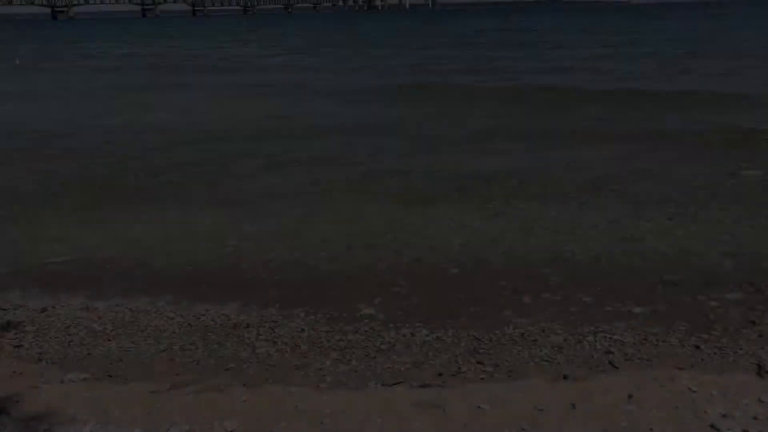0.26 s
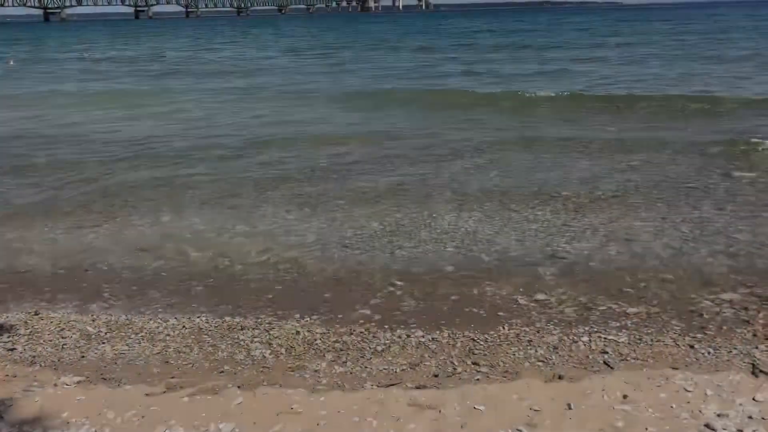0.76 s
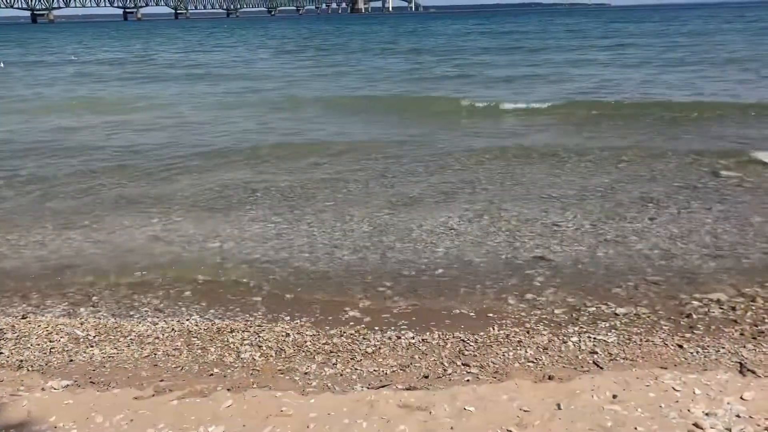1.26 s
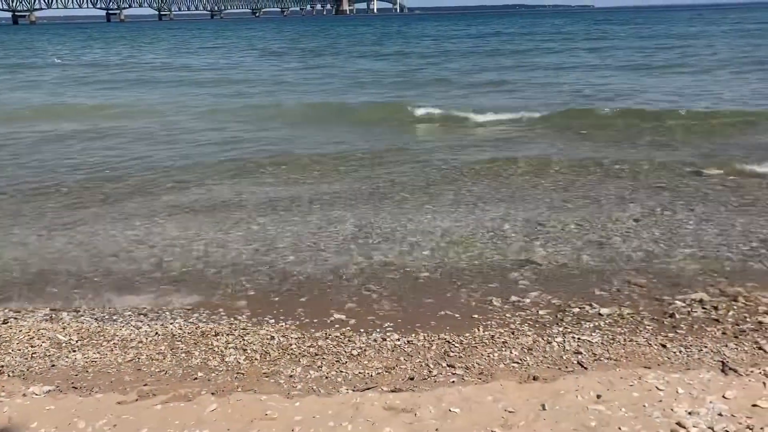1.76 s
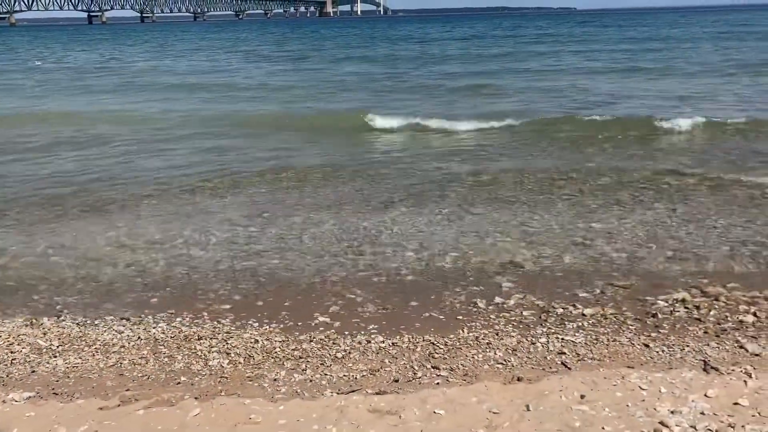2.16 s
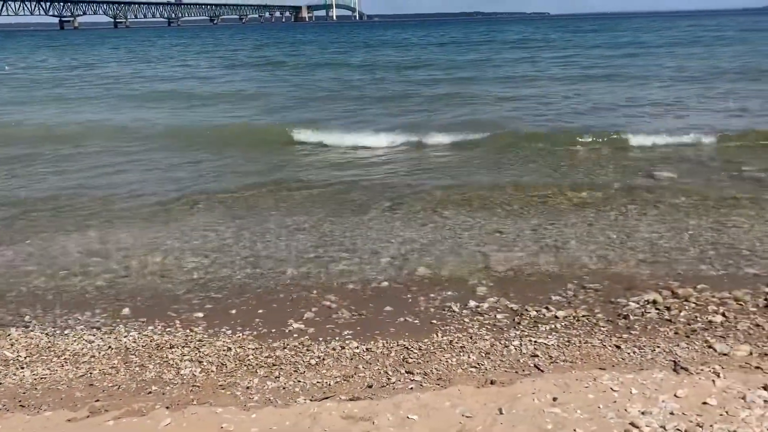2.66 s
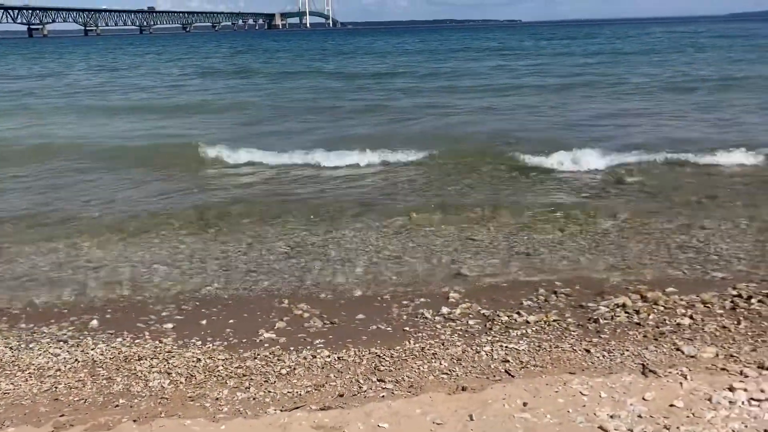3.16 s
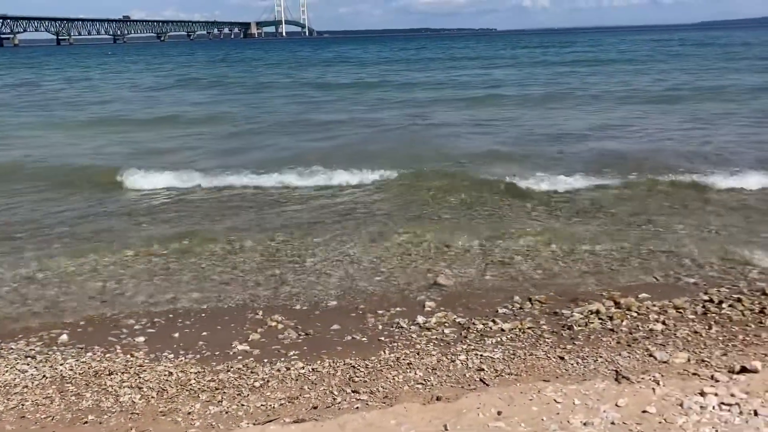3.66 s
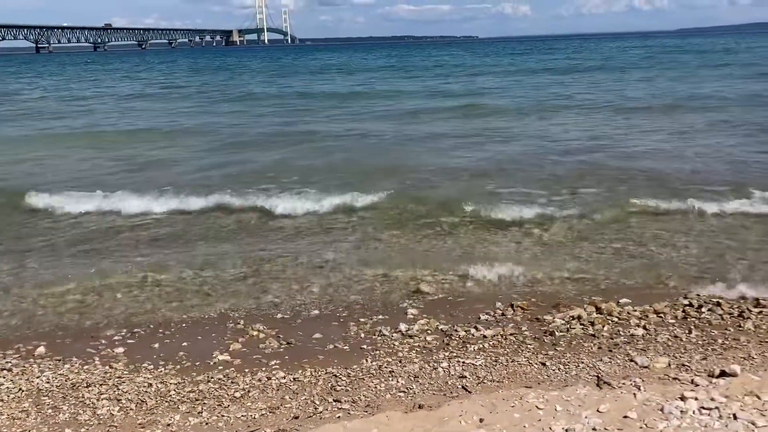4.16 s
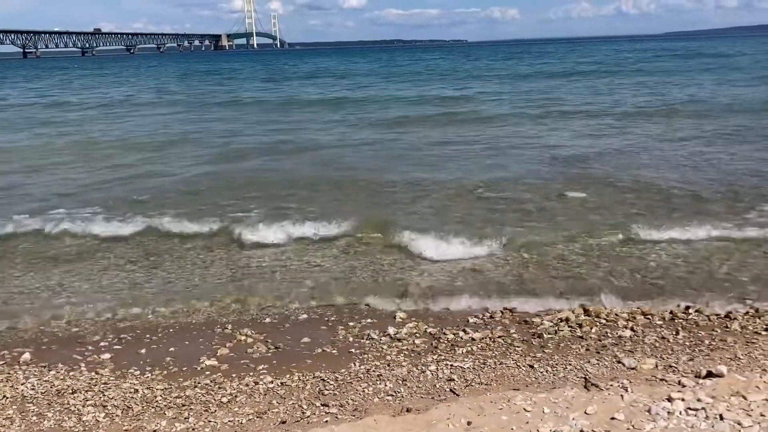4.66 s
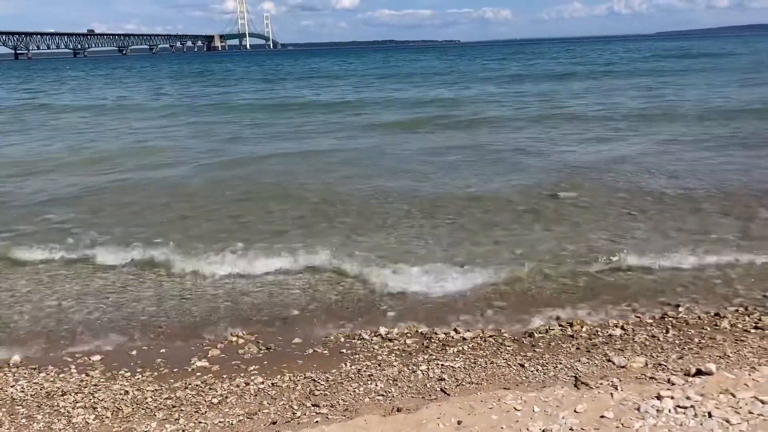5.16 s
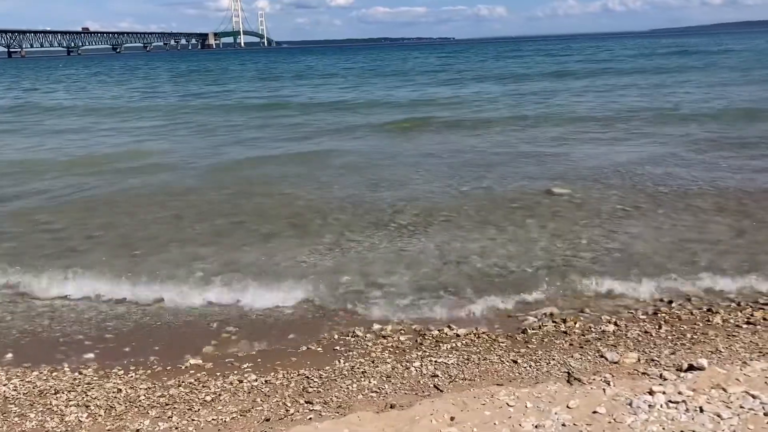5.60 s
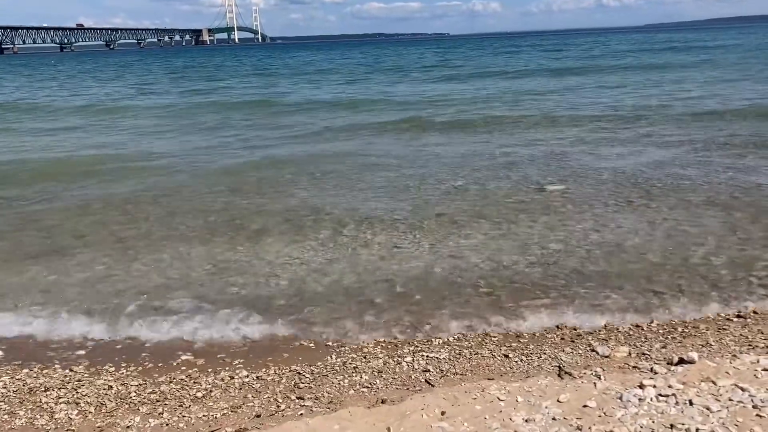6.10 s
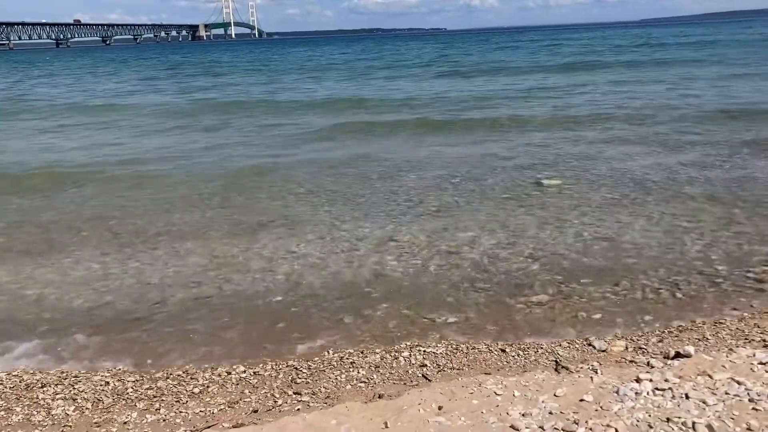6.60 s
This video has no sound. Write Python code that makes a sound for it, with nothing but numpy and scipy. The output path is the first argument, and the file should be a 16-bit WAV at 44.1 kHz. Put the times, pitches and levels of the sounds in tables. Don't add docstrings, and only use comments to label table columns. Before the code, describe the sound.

The sound rises from silence during the first second: low, uneven wind buffeting on a hand-held stereo microphone, muffled booms of distant surf, and foamy wash toward the right. Fine, bright spray fizzes on pebbles throughout, over a mid-toned watery rush. From 1.5 s a few rounded bubbles plop, including one clearly left at 2.3 s, and faint dry pebble ticks appear now and then. Around 3 s wind gusts again and a close, deeper breaker starts crossing from right to left. Between 4.4 and 4.7 s come its strongest, thickest plops, as the foam swells; more gurgling bubbles follow from 5 to 6 s. The wash and pebble hiss surge near 6 s, then ease. The fizz sinks into the stones, leaving softer foam at the left, scattered plops and low wind until about 6.8 s.

```python
import sys
import numpy as np
from scipy import signal
from scipy.fft import rfft, irfft, next_fast_len
from scipy.io import wavfile
from scipy.ndimage import uniform_filter1d, map_coordinates

SR = 44100
rng = np.random.default_rng(int(sys.argv[2]) if len(sys.argv) > 2 else 0)


def materialize(psi):
    bounded = np.clip(np.atleast_2d(psi).T, -1, 1)
    quanta = np.round(bounded * 32767).astype(np.int16)
    wavfile.write(sys.argv[1], SR, quanta)


def how_loud(loudness_db):
    steps = np.asarray(loudness_db, float) / 20
    return 10 ** steps


N = 301644
TIME_S = np.arange(N) / SR
FRAME = 512
HZ = np.fft.rfftfreq(FRAME, 1 / SR)[:, None]


def unit(x):
    return x / np.sqrt(np.mean(np.abs(x) ** 2) + 1e-20)


def along(points, hz):
    f, v = np.transpose(points)
    return np.interp(np.log(hz + 1), np.log(f + 1), v)


def curves(rows, count):
    s, *columns = np.transpose(rows)
    steps_s = np.linspace(0, N / SR, count)
    return [np.interp(steps_s, s, column) for column in columns]


def frames(x):
    return signal.stft(x, nperseg=FRAME, noverlap=FRAME * 3 // 4)[2]


def sound(z):
    return signal.istft(z, nperseg=FRAME, noverlap=FRAME * 3 // 4)[1][..., :N]


def colour(spectrum):
    return unit(how_loud(along([(1, -120), *spectrum, (SR / 2, -120)], HZ)))


def patches(shape, wide, long, depth_db):
    field = rng.standard_normal(shape)
    for _ in range(2):
        field = uniform_filter1d(field, round(wide), 0)
        field = uniform_filter1d(field, round(long), 1)
    return unit(how_loud(depth_db * unit(field)))


def wander(rate_hz):
    return map_coordinates(rng.standard_normal(200), [TIME_S * rate_hz])


def swells(events, width_s):
    return sum(db * np.exp(-((TIME_S - s) / width_s) ** 2) for s, db in events)


def bubbles(start_s, hz, size, cycles, rise):
    typical_hz = np.median(hz)
    samples = round(6 * cycles * SR / typical_hz)
    u = np.linspace(0, 6, samples)[None] * hz[:, None] / typical_hz
    swell_and_decay = u * np.exp(1 - u)
    wave = size[:, None] * swell_and_decay * np.sin(2 * np.pi * cycles * u * (1 + rise * u))
    at = (start_s * SR).astype(int)[:, None] + np.arange(samples)
    return np.bincount(at.ravel(), wave.ravel(), N + SR)[:N]


def panned_bubbles(events, trim_db, cycles, rise):
    s, db, hz, pan_db = np.transpose(events)
    left = bubbles(s, hz, how_loud(db + trim_db + pan_db / 2), cycles, rise)
    right = bubbles(s, hz, how_loud(db + trim_db - pan_db / 2), cycles, rise)
    return np.array([left, right])


def froth(count, centre_hz, spread, cycles, bubble_db):
    start_s = rng.random(count) * N / SR
    size = np.minimum(rng.exponential(size=count), 4)
    hz = centre_hz * np.exp(spread * np.clip(rng.standard_normal(count), -1, 2))
    pops = bubbles(start_s, hz, how_loud(1.7 * size), cycles, rise=0.028)
    return frames(unit(rng.standard_normal(N) + how_loud(bubble_db) * unit(pops)))


def lagged(z, turns):
    turn = np.exp(-1j * np.pi * turns)
    return np.array([z * turn, z / turn])


# t/s, foam level/dB, level/dB of drag over pebbles
SEA_MOTION = [(0.9, -37.5, -46.5), (1.42, -37.5, -45.5), (1.5, -39, -46.5), (1.83, -37.5, -44.5),
              (1.9, -41, -46.5), (3.27, -37, -46.5), (3.29, -38.5, -48.5), (3.55, -41, -49.5),
              (4.14, -38, -49), (4.29, -37.5, -49.5), (4.34, -39.5, -45), (4.58, -35, -45),
              (5.22, -37.5, -44.5), (5.32, -38, -49.5), (5.35, -36.5, -47), (6.06, -34.5, -43),
              (6.14, -37.5, -45.5), (6.78, -39.5, -47.5)]


def follows(law, count):
    mean_db, per_foam, per_drag = law
    foam_db, drag_db = curves(SEA_MOTION, count)
    return mean_db + per_foam * (foam_db - foam_db.mean()) + per_drag * (drag_db - drag_db.mean())


# f/Hz, level/dB
PORT_DIFFERENCE = [(30, -10), (70, -12), (150, -15), (300, -10.5)]


def low_noise(spectrum):
    size = next_fast_len(N)
    hz = np.fft.rfftfreq(size, 1 / SR)
    tone = how_loud(along([*spectrum, (2000, -120)], hz))
    gain = np.array([tone, tone * how_loud(along(PORT_DIFFERENCE, hz))])
    mid, side = irfft(rfft(rng.standard_normal((2, size))) * gain, size)[:, :N]
    return unit(np.array([mid + side, mid - side]))


# f/Hz, level/dB per Hz
WIND_SPECTRUM = [(20, -32), (32, -26), (50, -8.5), (67, -0.5), (90, -2.5), (115, -13), (160, -32)]
# t/s, level/dB above calm
WIND_GUSTS = [(.39, 5.5), (.63, 5.5), (1.2, 6.5), (1.5, 1.5), (1.85, 1), (2.19, 0), (2.55, 3.5), (2.79, 0),
              (3.12, 7), (3.51, 6), (4.05, 5), (4.35, 5.5), (4.62, 3.5), (5.03, 6.5), (5.4, 3.5), (5.67, 4),
              (6.27, 2.5), (6.6, 4)]
# f/Hz, level/dB per Hz
FAR_SURF_SPECTRUM = [(80, -23), (115, -1), (140, 1), (200, -0.5), (280, -6), (400, -10), (600, -27)]
# t/s, level/dB above the steady far surf
FAR_BOOMS = [(.25, 4), (.63, 4), (.87, 2.5), (1.11, 3), (2.45, 1), (2.75, 3), (3.39, 1.5), (4.47, 2.5),
             (4.98, 1), (5.43, 1.5), (5.67, 1.5), (5.9, -0.5), (6.55, 2), (6.8, 1.5)]


def rumble():
    wind_db = -40.5 + swells(WIND_GUSTS, width_s=0.091)
    far_db = follows((-39, -0.54, 0), N) + swells(FAR_BOOMS, width_s=0.12)
    lumps_db = wander(rate_hz=12)
    wind = how_loud(wind_db + 0.3 * lumps_db) * low_noise(WIND_SPECTRUM)
    return wind + how_loud(far_db + 0.99 * lumps_db) * low_noise(FAR_SURF_SPECTRUM)


# t/s, right end level/dB, left end level/dB, breaker level/dB, left port's lag on it/ms
SURF_PLACES = [(0, 3.5, -8, -24, 0.23), (1, 1, -1.5, -14, 0.25), (2, -1.5, -3.5, -21, 0.17),
               (2.6, -6.5, -6.5, -11.5, 0.0011), (3.1, 1, 4, -5.5, 0.051), (3.6, -14, -9, -2, 0.12),
               (4.1, -9, -4.5, -5, 0.14), (4.6, 2.5, -2, 2, -0.043), (5.2, -7, -9, 2.5, -0.14),
               (5.7, -2.5, -4, 4.5, -0.15), (6.1, -1, -11, -9.5, -0.039), (6.4, -30, 1, 0.5, -0.23),
               (6.84, -38, 2.5, -0.5, -0.25)]
# f/Hz, level/dB
BREAKER_TONE = [(500, 7.5), (1500, 8.5), (5000, -10.5)]
# f/Hz, level/dB
SCATTERED_SURF = [(300, -2), (1000, 2.5), (3000, -6), (5500, -4), (8000, -12)]
# f/Hz, level/dB per Hz
CHURN_SPECTRUM = [(250, 3), (400, -3.5), (550, 5), (800, -1), (1100, 0.5), (1500, -1.5), (2000, -35)]
# f/Hz, level/dB per Hz
WASH_SPECTRUM = [(1100, -58), (1500, 1), (1900, 1), (2300, 1), (3000, -2), (3800, -51)]
# f/Hz, level/dB per Hz
HISS_SPECTRUM = [(2300, -44), (3000, 0), (3500, 2), (4200, 0), (5000, -3), (5800, -4.5), (6600, -36)]


def surf():
    right, left, breaker, *around = [
        froth(count=4000, centre_hz=1500.0, spread=0.718, cycles=2.99, bubble_db=-15.5) for _ in range(5)]
    shape, steps = right.shape, right.shape[1]
    right_db, left_db, breaker_db, breaker_lag_ms = curves(SURF_PLACES, steps)
    right_gain, left_gain = how_loud(right_db), how_loud(left_db)
    breaker_gain = how_loud(breaker_db + along(BREAKER_TONE, HZ))
    around_gain = how_loud(along(SCATTERED_SURF, HZ))

    field = around_gain * np.array(around)
    for gain, foam, lag_ms in [(right_gain, right, 0.28), (left_gain, left, -0.43),
                               (breaker_gain, breaker, breaker_lag_ms)]:
        swirl = patches(shape, wide=8, long=9.4, depth_db=0.5)
        field = field + gain * swirl * lagged(foam, HZ * lag_ms / 1000)
    field = field / np.sqrt(right_gain ** 2 + left_gain ** 2 + breaker_gain ** 2 + around_gain ** 2)

    churn = how_loud(follows((-37, 0.61, 0.09), steps)) * colour(CHURN_SPECTRUM)
    wash = how_loud(follows((-40, 0.82, -0.14), steps)) * colour(WASH_SPECTRUM)
    hiss = how_loud(follows((-43.5, 0.05, 1.06), steps)) * colour(HISS_SPECTRUM)
    ripple = patches(shape, wide=2, long=6, depth_db=1.5)
    return sound(field * ripple * np.sqrt(churn ** 2 + wash ** 2 + hiss ** 2))


# f/Hz, level/dB per Hz
SPRAY_SPECTRUM = [(4500, -20), (5500, -4), (6300, -2.5), (7500, 0.7), (8500, 1.5), (10000, 0), (11500, -2),
                  (13000, -5), (14300, -7), (15800, -7.5)]
# f/Hz, lag/turns
SPRAY_LAG = [(4700, -.5), (6980, 0), (9100, .5), (11350, 1), (13650, 1.5), (16100, 2)]


def fizz():
    z = froth(count=4000, centre_hz=8830, spread=0.44, cycles=1.4, bubble_db=-12.5)
    z = z * patches(z.shape, wide=180, long=5, depth_db=0.6)
    z = z * patches(z.shape, wide=10, long=32, depth_db=-0.1)
    z = z * patches(z.shape, wide=2, long=6, depth_db=1.7) * colour(SPRAY_SPECTRUM)
    right_db = curves(SURF_PLACES, N)[0]
    level_db = follows((-42, 0.39, 0.11), N) + 0.042 * (right_db + 6)
    level_db = level_db - 2 * np.maximum(TIME_S - 5.99, 0)
    return how_loud(level_db) * sound(lagged(z, along(SPRAY_LAG, HZ)))


# t/s, peak level/dB, f/Hz, left-right level/dB
BIG_BUBBLES = [(1.52, -32, 496, 0.5), (1.646, -25, 855, -1), (1.774, -20, 577, 1.0), (2.316, -25, 534, 13),
               (2.413, -32, 483, 1.5), (4.443, -11, 2220, 3), (4.522, -9.5, 645, -2), (4.641, -8, 790, -4),
               (5.005, -22, 704, 1.5), (5.049, -21, 710, -3), (5.359, -13, 641, -2), (5.407, -14, 1310, -1),
               (5.566, -10.5, 1440, 1.0), (5.705, -16, 557, 6), (5.79, -20, 665, 3), (5.975, -18, 560, -5),
               (6.241, -17, 770, 4), (6.378, -15, 1290, 1.5), (6.563, -23, 770, 7), (6.717, -17, 810, 1.5)]


def plops():
    return panned_bubbles(BIG_BUBBLES, trim_db=-16, cycles=2.04, rise=0.012)


# t/s, peak level/dB, f/Hz, left-right level/dB
PEBBLE_TICKS = [(1.6443, -31, 7380, 0.0), (1.996, -38, 10600, 0.0), (2.2021, -29, 11700, 0.0),
                (2.8551, -35, 7290, 0.0), (3.2177, -31, 10900, 0.0), (3.3907, -26, 11200, -0.5),
                (3.6268, -40, 7140, 0.0), (3.9182, -35, 7370, 0.0), (4.1855, -35, 10800, 0.5),
                (4.2953, -32, 11200, 0.0), (4.9049, -39, 7720, 0.0), (5.311, -34, 11800, 0.0),
                (5.7295, -31, 11500, 0.0), (5.8498, -32, 11600, -0.5), (6.3327, -38, 11400, 0.0),
                (6.4998, -32, 11100, 0.0)]


def ticks():
    return panned_bubbles(PEBBLE_TICKS, trim_db=0, cycles=1.9, rise=0)


def scene():
    flicker_db = 0.5 * wander(rate_hz=14)
    return rumble() + how_loud(flicker_db) * (surf() + fizz()) + plops() + ticks()


def top_cut(x):
    return signal.sosfilt(signal.butter(12, 15910, fs=SR, output="sos"), x)


# f/Hz, left-right level/dB
PORT_BALANCE = [(60, -.8), (150, -.7), (300, .3), (600, 1.3), (3000, 1.3), (6000, 0)]
# f/Hz, share
FAINT_BANDS = [(11500, 0.001), (12500, .05), (14200, 0.26), (15300, .05)]


def record(dry):
    z, tilt = frames(dry), how_loud(along(PORT_BALANCE, HZ) / 2)
    bands, spells = np.arange(z.shape[1]) // 3, np.arange(z.shape[2]) // 8
    chance = rng.random((bands[-1] + 1, spells[-1] + 1))[bands][:, spells]
    kept = np.where(chance < along(FAINT_BANDS, HZ), how_loud(-26), 1) * (HZ < 15760)
    ports = sound(z * np.array([tilt, 1 / tilt]) * kept)
    fade_in = np.clip(TIME_S / 1.0, 0, 1)
    return top_cut(ports * fade_in)


dry = scene()
out = record(dry)
materialize(out)
```